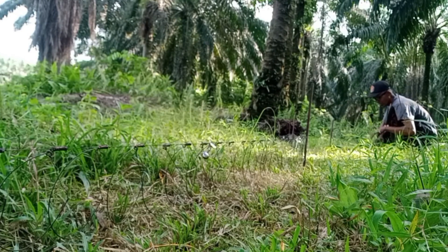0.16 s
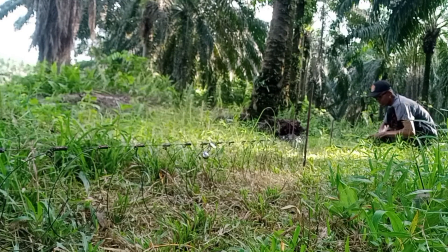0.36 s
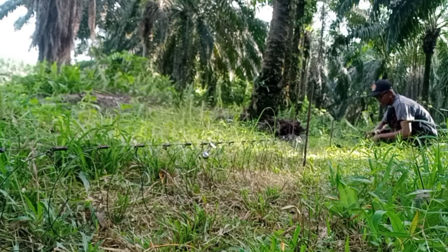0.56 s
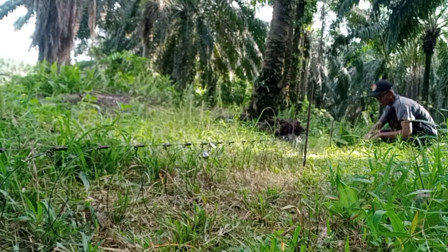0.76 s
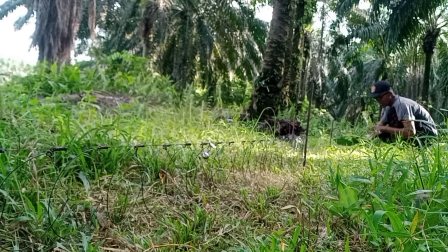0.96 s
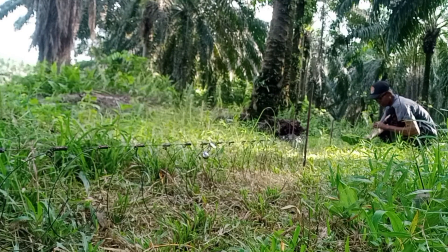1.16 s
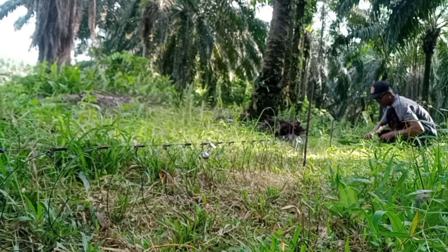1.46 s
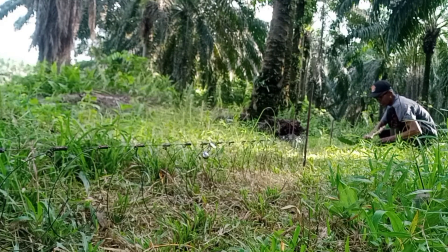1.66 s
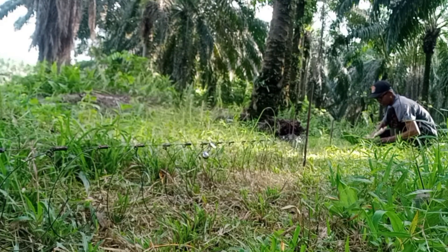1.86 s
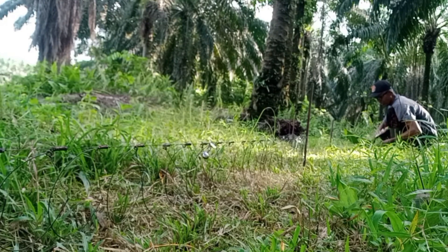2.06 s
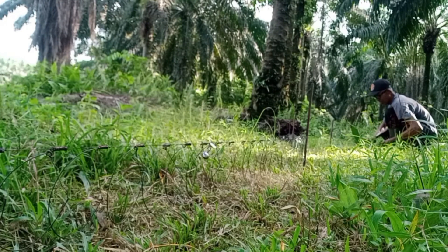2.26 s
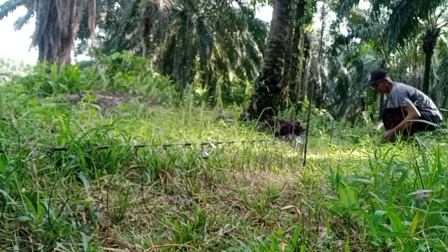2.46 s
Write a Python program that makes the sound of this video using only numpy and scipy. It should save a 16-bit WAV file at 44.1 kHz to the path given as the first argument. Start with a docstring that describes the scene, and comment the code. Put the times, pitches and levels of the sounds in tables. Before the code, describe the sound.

Short rising bird calls, twice a second, with a steady high insect drone behind.

```python
"""From the start, insects drone over quiet air in a palm plantation and a cricket chirps in wing strokes.
At 0.2 s a white-breasted waterhen begins to call twice a second: a nearly pure low note breaks by
period doubling and lands on a louder high one. After each onset the trunks scatter the sound back.
From 0.5 s to about 1 s the grass rustles faintly, and once more at 2.1 s, just before the last call."""
import sys
import numpy as np
from scipy import signal
from scipy.fft import rfft, irfft, next_fast_len
from scipy.io import wavfile
from scipy.ndimage import uniform_filter1d, map_coordinates

SR = 44100
rng = np.random.default_rng(int(sys.argv[2]) if len(sys.argv) > 2 else 0)


def generate_wav(signal):
    """Clip the signal to [-1, 1] and save it as 16-bit WAV at the path in sys.argv[1]."""
    frames = np.transpose(np.atleast_2d(signal))
    scaled = np.clip(frames, -1, 1) * 32767
    pcm = np.round(scaled).astype(np.int16)
    wavfile.write(sys.argv[1], SR, pcm)


N = 114660


def amp(db):
    """Amplitude ratio of a level in decibels."""
    return 10 ** (np.asarray(db) / 20)


def unit(x):
    """Normalisation to rms 1."""
    return x / np.sqrt(np.mean(x ** 2) + 1e-20)


def along(points, hz):
    """Interpolation of (f/Hz, value) points on a logarithmic frequency axis."""
    f, v = np.transpose(points)
    return np.interp(np.log(hz + 1), np.log(f + 1), v)


def filtered(x, response):
    """Linear filtering: the spectrum of x times a frequency response."""
    m = next_fast_len(len(x) + 8192)
    return irfft(rfft(x, m) * response(np.fft.rfftfreq(m, 1 / SR)), m)[:len(x)]


def coloured(x, spectrum):
    """Spectral shaping by (f/Hz, level/dB) points."""
    return filtered(x, lambda hz: amp(along(spectrum, hz)))


def noise(spectrum, size):
    """Spectrally shaped Gaussian noise of rms 1."""
    return unit(coloured(rng.standard_normal(size), spectrum))


def wobble(rate, size):
    """Smooth random modulation: a spline through rate knots a second."""
    return map_coordinates(rng.standard_normal(4096), [np.arange(size) * rate / SR + 2], mode='wrap')


def gate(t, start, attack, release, end):
    """Amplitude envelope with raised-cosine edges; times in seconds."""
    ease = lambda u: np.sin(np.pi / 2 * np.clip(u, 0, 1)) ** 2
    return ease((t - start) / attack) * ease((end - t) / release)


def add(track, start, x):
    """Superposition of x on the track from start seconds."""
    i = round(start * SR)
    x = x[max(-i, 0):max(len(track) - i, 0)]
    track[max(i, 0):][:len(x)] += x


# spectrum of outdoor air (f/Hz, level/dB)
AIR_SPECTRUM = [(25, -16), (45, -9.5), (75, 1), (130, 2), (250, -2.5), (500, -9), (1000, -8), (2000, -12.5),
                (4000, -14.5), (10000, -21.5)]
def air():
    """Ambient noise: broadband, strongest at low frequencies, wavering slightly."""
    return amp(-80 + .8 * wobble(8, N)) * noise(AIR_SPECTRUM, N)


# spectra of the three insect bands (f/Hz, level/dB)
DRONE_SPECTRUM = [(5800, -42), (6250, -26), (6490, -9), (6700, -1), (7100, 2), (7500, -0.5), (7850, -5),
                  (8100, -11.5), (8500, -18), (8900, -21.5), (9400, -30), (10000, -37.5), (10600, -24),
                  (11000, -18.5), (11600, -26), (12300, -33), (13500, -25.5), (16000, -52)]
FAR_SPECTRUM = [(3900, -35), (4250, -13), (4550, 1.5), (4750, 0), (5000, -8.5), (5350, -4.5), (5750, 6.5),
                (6050, -2), (6400, -22.5)]
SIZZLE_SPECTRUM = [(12000, -34.5), (13000, -18.5), (13700, -9), (14200, 3), (14600, -1.5), (15100, -1),
                   (15500, -7.5)]
# swells of the sizzle (t/s, relative level/dB)
SIZZLE_SWELLS = [(0.0, -70.5), (0.06, -65), (0.17, -61), (0.3, -69), (0.78, -64), (0.82, -73.5),
                 (0.93, -59.5), (1.03, -76.5), (1.05, -62.5), (1.09, -72), (1.14, -61), (1.17, -66.5),
                 (1.22, -59.5), (1.24, -68), (1.43, -64), (1.45, -71.5), (1.61, -63), (1.64, -73.5),
                 (1.65, -61.5), (1.8, -69), (2.03, -67.5), (2.2, -59.5), (2.24, -68.5), (2.45, -61.5),
                 (2.48, -69), (2.56, -62), (2.58, -74), (2.6, -65)]
def insects(sway_db=.5, flutter_db=.77):
    """A chorus sums incoherently to noise bands: a 7 kHz drone, a farther one below, a sizzle above."""
    drone = amp(-51.5 + sway_db * wobble(14, N) + flutter_db * wobble(160, N)) * noise(DRONE_SPECTRUM, N)
    far = amp(-67.5 + .81 * wobble(11, N)) * noise(FAR_SPECTRUM, N)
    swell_db = 3 + np.interp(np.arange(N) / SR, *np.transpose(SIZZLE_SWELLS))
    sizzle = amp(swell_db + 1.1 * wobble(26, N)) * noise(SIZZLE_SPECTRUM, N)
    return drone + far + sizzle


# chirps (onset t/s, duration/s, relative level/dB)
CRICKET_CHIRPS = [(-.012, .058, -53), (0.123, .048, -53), (0.244, .07, -53.5), (0.395, .07, -53),
                  (.548, .048, -53), (0.691, .06, -52.5), (0.824, .07, -54), (.97, .048, -53.5),
                  (1.11, .06, -54), (1.246, .07, -53), (1.393, .07, -55), (1.545, .048, -55),
                  (1.674, .048, -53), (1.814, .06, -52), (1.951, .07, -51.5), (2.098, .07, -54),
                  (2.243, .07, -52.5), (2.388, .048, -52.5), (2.521, .048, -52.5)]
def cricket(carrier_hz=5509, fall_hz=390, stroke_s=.011, period_s=.012, echo_db=-5):
    """Stridulation: each chirp is a few wing strokes, each a short falling tone, the first softer."""
    out, t = np.zeros(N), np.arange(SR // 3) / SR
    progress = np.clip(t / stroke_s, 0, 1)
    for start, length, db in CRICKET_CHIRPS:
        chirp = np.zeros(len(t))
        deviations = rng.standard_normal((8, 3))[:round(length / period_s)] * (40, .5, .0007)
        for k, (off_hz, off_db, off_s) in enumerate(deviations):
            hz = carrier_hz + off_hz + fall_hz * (.5 - progress)
            stroke = np.sqrt(2) * np.sin(np.pi * progress) * np.sin(2 * np.pi * np.cumsum(hz) / SR)
            add(chirp, k * period_s + off_s, amp(off_db - 4 * (k == 0)) * stroke)
        add(out, start, amp(db + 1.5) * (chirp + amp(echo_db) * trunk_echo(chirp, build_s=.01)))
    return out


# reverberation time among the trunks (f/Hz, T60/s)
TRUNK_T60 = [(300, .2), (850, .22), (1200, 0.34), (3700, 0.29), (8000, 0.17)]
def trunk_echo(x, build_s, bend=1.11):
    """Multiple scattering: an echo with the energy of x builds up, then decays band by band."""
    hz, t, bands = signal.stft(rng.standard_normal(SR // 2), SR, nperseg=256)
    decay = amp(-60 * (t / along(TRUNK_T60, hz)[:, None]) ** bend)  # bend over 1: holds, then drops
    build = 1 - np.exp(-t / build_s)
    tail = signal.istft(bands * decay * build, SR, nperseg=256)[1]
    return unit(signal.fftconvolve(x, tail)[:len(x)]) * np.std(x)


# pitch contour of a call (t/s from onset, f/Hz)
CALL_PITCH = [(0, 890), (.008, 853), (.028, 850), (.041, 900), (.047, 1015), (.055, 1135), (.061, 1205),
              (.067, 1248), (.081, 1207), (.1, 1216)]
# partials at 1/2, 1 and 3/2 of the pitch during the break (level/dB)
BREAK_LEVELS = [-15.5, -17, -31]
# spectra of the rasp throughout and the hoarse grunt around the break (f/Hz, level/dB)
RASP_SPECTRUM = [(150, -34), (300, -17), (450, 1), (680, -2.5), (960, 6.5), (1150, -2), (1400, -22),
                 (1900, -39)]
GRUNT_SPECTRUM = [(120, -32.5), (200, -11), (278, 6), (350, -8.5), (480, -22.5), (900, -54)]
def voice(t, length, third_db, jitter=.0067, shimmer_db=1, waver_db=.88, roughness=.55):
    """Register break: a low note passes through period doubling to a high one with a rough harmonic."""
    hz = np.interp(t, *np.transpose(CALL_PITCH)) * (1 + jitter * wobble(250, len(t)))
    phase = 2 * np.pi * np.cumsum(uniform_filter1d(hz, size=160)) / SR
    partial = lambda order, db: np.sqrt(2) * amp(db) * np.sin(order * phase)
    high = gate(t, .05, .013, .023, length) * partial(1, 0) * amp(waver_db * wobble(130, len(t)))
    flutter = 1 + roughness * wobble(420, len(t))
    third = gate(t, .055, .011, .023, length) * partial(3, third_db) * flutter
    low = gate(t, -.002, .01, .007, .047) * partial(1, -7.5) * amp(shimmer_db * wobble(250, len(t)))
    doubled = sum(partial(order, db) for order, db in zip((.5, 1, 1.5), BREAK_LEVELS))
    crack = gate(t, .0395, .009, .012, .0646) * doubled
    rasp = amp(-32) * gate(t, -.0027, .0047, .03, length) * noise(RASP_SPECTRUM, len(t))
    grunt = amp(-32) * gate(t, .01, .041, .078, .095) * noise(GRUNT_SPECTRUM, len(t))
    return low + crack + rasp + grunt, high, third


# calls (onset t/s, source level/dB, duration/s, relative third-harmonic level/dB)
WATERHEN_CALLS = [(0.218, -31, .1, -27.5), (0.722, -30.5, 0.099, -26), (1.2255, -29.5, 0.1, -27),
                  (1.732, -30.5, 0.1, -26.5), (2.2278, -30.5, .099, -22.5)]
# frequency responses of the throat and of the scattering trunks (f/Hz, level/dB)
THROAT_RESPONSE = [(530, 2.5), (580, -5.5), (660, -13), (760, 0), (820, -1.5), (1620, 1), (1740, -23.5),
                   (3250, -17), (3450, -5), (3700, -1), (3790, 0), (3950, -15.5)]
TRUNK_RESPONSE = [(300, -32.5), (850, -30.5), (1130, -15.5), (1180, -24), (1230, -26), (1600, -15.5),
                  (3000, 2), (3700, 3), (5500, 5.5)]
def waterhen(lead_s=.02):
    """Source and filter: the throat colours each part of the voice, and the trunks scatter it back."""
    out, t = np.zeros(N), np.arange(SR // 2) / SR - lead_s
    for start, db, length, third_db in WATERHEN_CALLS:
        for part in voice(t, length, third_db):
            direct = coloured(part, THROAT_RESPONSE)
            scattered = coloured(trunk_echo(direct, build_s=.03), TRUNK_RESPONSE)
            add(out, start - lead_s, amp(db) * (direct + scattered))
    return out


# rustles (onset t/s, duration/s, level/dB)
GRASS_RUSTLES = [(0.528, 0.17, -67.5), (0.596, 0.22, -71.5), (0.721, 0.1, -59.5), (0.833, 0.12, -64),
                 (2.103, 0.068, -73.5)]
# spectrum of the leaves (f/Hz, level/dB)
GRASS_SPECTRUM = [(200, -23), (450, -12.5), (600, 1.5), (780, -6), (1000, -2), (1250, 4), (1550, 2.5),
                  (1950, -19.5), (2450, -8.5), (2750, -13), (3500, -12), (6000, -11.5), (12000, -18.5)]
def grass(grain_db=3, ripple_db=3):
    """Resonance: each bunch of leaves colours grainy, amplitude-modulated noise in its own way."""
    out, t = np.zeros(N), np.arange(SR // 4) / SR
    for start, length, db in GRASS_RUSTLES:
        leaves = filtered(noise(GRASS_SPECTRUM, len(t)), lambda hz: amp(ripple_db * wobble(600, len(hz))))
        grains = unit(leaves * amp(grain_db * wobble(220, len(t))))
        add(out, start, amp(db) * gate(t, 0, .24 * length, .5 * length, length) * grains)
    return out


def scene():
    """Superposition of all sources in one channel."""
    return (air() + waterhen() + cricket() + insects() + grass())[None]


def record(dry):
    """Band limiting: an ideal low-pass filter at 15550 Hz."""
    return np.array([filtered(channel, lambda hz: hz < 15550) for channel in dry])


dry = scene()
out = record(dry)
generate_wav(out)
```